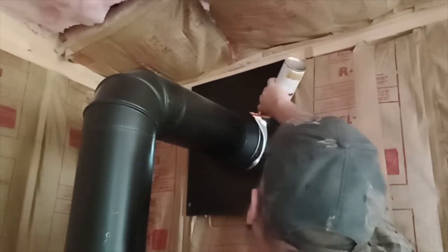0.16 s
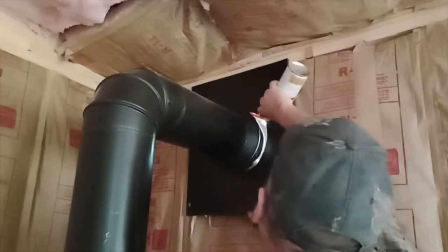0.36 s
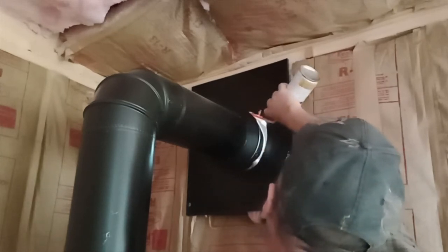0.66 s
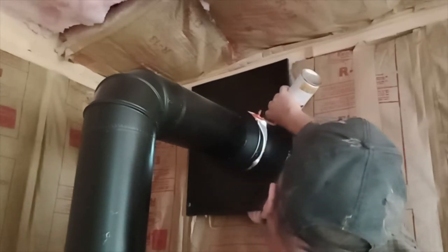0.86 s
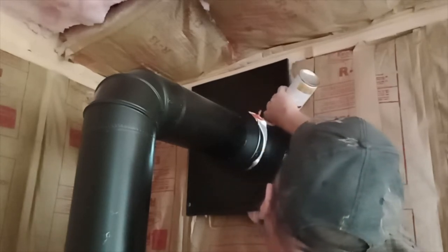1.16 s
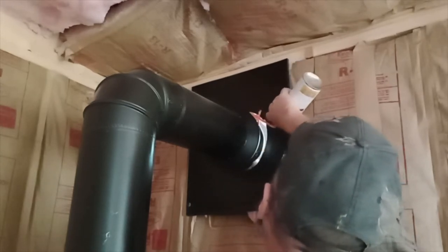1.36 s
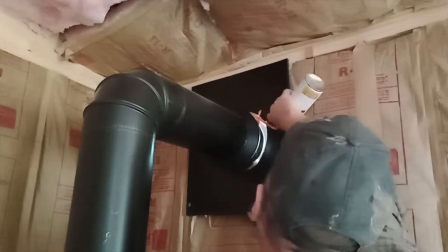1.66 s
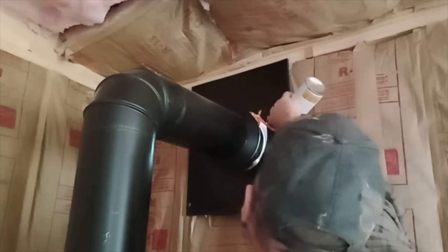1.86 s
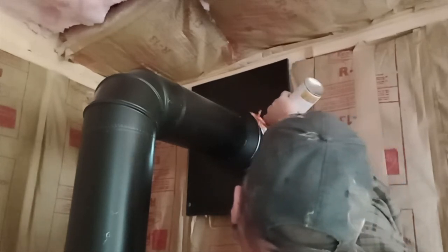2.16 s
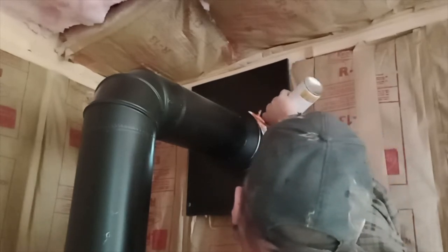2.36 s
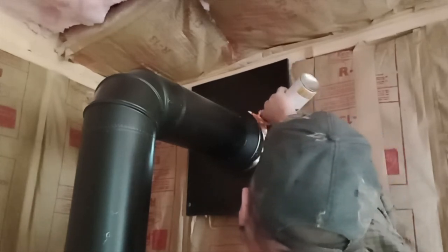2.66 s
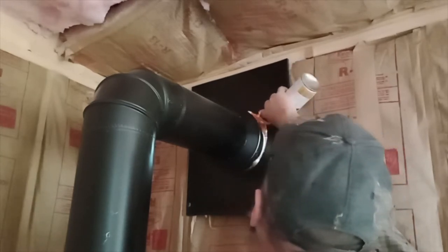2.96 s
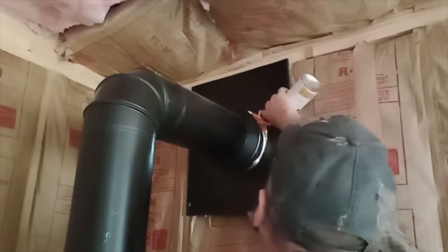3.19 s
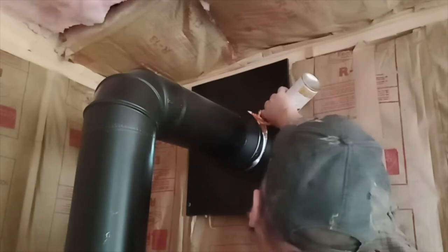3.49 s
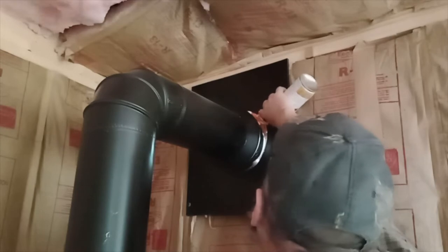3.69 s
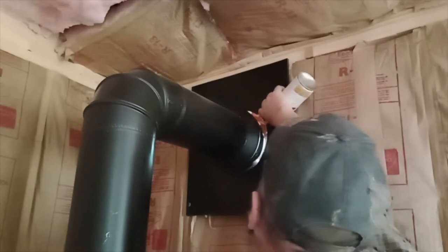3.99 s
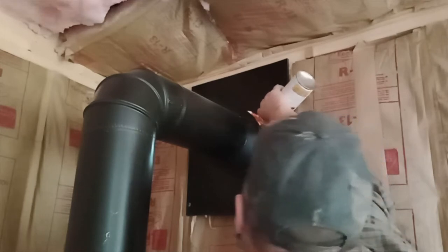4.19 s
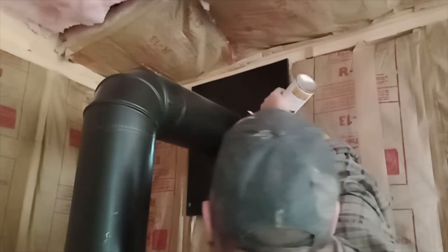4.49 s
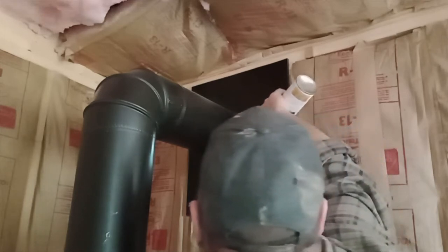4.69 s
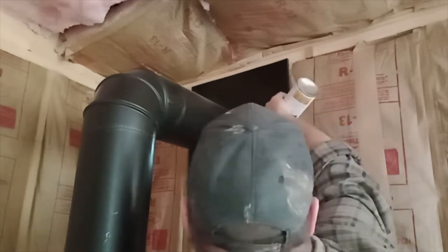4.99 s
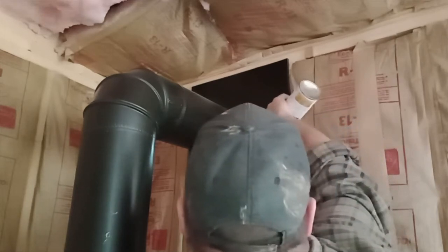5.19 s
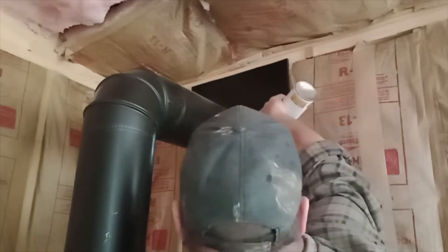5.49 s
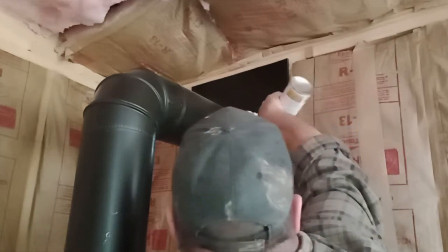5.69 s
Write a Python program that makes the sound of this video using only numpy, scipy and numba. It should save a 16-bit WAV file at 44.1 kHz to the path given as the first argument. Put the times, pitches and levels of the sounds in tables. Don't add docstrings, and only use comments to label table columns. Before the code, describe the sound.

Close, continuous foam spray indoors: a crisp airy hiss with thin whistles, then spurts and pops as the sound dulls and bubbles.

```python
import sys
import numpy as np
from scipy import signal
from scipy.fft import rfft, irfft, next_fast_len
from scipy.io import wavfile
from scipy.ndimage import uniform_filter1d
from numba import njit

SR = 44100
rng = np.random.default_rng(int(sys.argv[2]) if len(sys.argv) > 2 else 0)


def volts_from_db(level):
    exponent = np.asarray(level, float) / 20
    return 10 ** exponent


def wav_out(sig):
    wavfile.write(sys.argv[1], SR, np.round(np.clip(np.atleast_2d(sig).T, -1, 1) * 32767).astype(np.int16))


N = 257984
PADDED = next_fast_len(N)
HZ = np.fft.rfftfreq(PADDED, 1 / SR)


def unit(x):
    return x / np.sqrt(np.mean(x ** 2))


def colour(points):
    hz, db = np.transpose(points)
    return volts_from_db(np.interp(np.log(HZ + 1), np.log(hz), db))


def above(hz, width):
    return np.clip((HZ - hz) / width + .5, 0, 1)


def walk(rate):
    k = int(SR / rate)
    held = np.repeat(rng.standard_normal(N // k + 1), k)
    return 1.13 * uniform_filter1d(uniform_filter1d(held, k), k)[:N]


def swells(at, half):
    t = np.arange(0, N, 64)[:, None] / SR
    return np.exp(-((t - at) / half) ** 2)


def filled(coarse):
    return np.interp(np.arange(N), np.arange(0, N, 64), coarse)


@njit
def moving_mode(x, hz, width):
    y, band, low = np.empty(len(x)), 0., 0.
    for i in range(len(x)):
        g, k = np.tan(np.pi * hz[i] / SR), width / hz[i]
        v = (band + g * (x[i] - low)) / (1 + g * (g + k))
        band, low, y[i] = 2 * v - band, low + 2 * g * v, k * v
    return y


def jet(cells_per_s, spread_db, cells_db, surge_db):
    when, size, side = rng.random((3, N))
    rarity = np.minimum(-np.log(1 - size), 2.2)
    cells = unit(volts_from_db(spread_db * rarity) * np.sign(side - .5) * (when < cells_per_s / SR))
    surge = volts_from_db(surge_db * walk(60) + 1.01 * walk(200))
    return (rng.standard_normal(N) + volts_from_db(cells_db) * cells) * surge


# (time [s], first mode [Hz], second mode over first [ratio], first ring [dB], second ring [dB])
HOLLOW_SHAPES = [(0, 1880, 1.87, -2.5, 8.5), (.4, 2080, 1.75, 3.5, 8), (.7, 2000, 1.65, 5.5, 9.5),
                 (1.05, 1880, 1.75, 6.5, 10), (1.35, 1880, 1.88, 4.5, 4.5), (1.75, 1690, 2.03, -3, -3),
                 (2.1, 1620, 2, -0.5, -6), (2.35, 1360, 1.75, -1, 1), (2.7, 1500, 1.8, 8.5, 2),
                 (3.05, 1460, 2.55, -2, 3), (3.4, 1150, 2.43, 0.5, 1.5), (3.6, 1320, 2.1, 2, 9),
                 (3.93, 1320, 2.6, 7.5, 1), (4.08, 1000, 3.15, 2.5, 8), (4.32, 1340, 2.8, 5, -8),
                 (4.6, 1620, 2.18, 11, 8.5), (5.3, 1360, 2.55, 5, -9), (5.85, 1140, 2, 6.5, -20)]


def hollow(x):
    s, *columns = np.transpose(HOLLOW_SHAPES)
    hz, ratio, low_db, high_db = (np.interp(np.arange(N) / SR, s, c) for c in columns)
    low_hz = hz * (1 + 0.1 * walk(9))
    high_hz = hz * ratio * (1 + 0.032 * walk(7.1))
    low = volts_from_db(low_db + 1.4 * walk(12)) * moving_mode(x, low_hz, 530.0)
    high = volts_from_db(high_db + 1.0 * walk(4.8)) * moving_mode(x, high_hz, 820.0)
    return x + low + high


def nearby_walls(t60, wet_db):
    t = np.arange(int(.3 * SR)) / SR
    tail = rng.standard_normal(len(t)) * 1000. ** (-t / t60) * (t > .001)
    tail = tail * volts_from_db(wet_db) / np.sqrt(np.sum(tail ** 2))
    return 1 + rfft(tail, PADDED)


# (time [s], flow [dB], cover [0-1])
TRIGGER = [(0, -34.5, 0.1), (.2, -34, 0.06), (.57, -35, 0.01), (.87, -33.5, 0.05), (1.0, -34.5, 0.15),
           (1.42, -34.5, 0.01), (1.56, -34, 0.35), (1.8, -33.5, 0.52), (2.3, -33.5, 0.7),
           (2.75, -40.5, 0.69), (2.95, -36, 0.99), (3.35, -37.5, 0.99), (4.0, -40, 0.91),
           (4.4, -40.5, 0.82), (4.52, -45.5, 0.56), (5.0, -39.5, 0.78), (5.4, -43, 0.69),
           (5.85, -41.5, 0.86)]


def control(column):
    table = np.array(TRIGGER)
    return np.interp(np.arange(N) / SR, table[:, 0], table[:, column])


# (time [s], lift [dB], centre [Hz], half length [s])
PUFFS = [(1.607, 6, 3640, 0.014), (1.682, 3, 4400, 0.038), (1.835, -6, 3400, 0.018),
         (1.898, 6.5, 4300, 0.045), (1.958, 3, 6000, 0.015), (2.067, 4, 3420, 0.021),
         (2.223, 11.5, 5300, 0.044), (2.382, 5, 4000, 0.016), (2.445, -2, 5020, 0.025),
         (2.553, 5.5, 7000, 0.056), (2.733, 6, 3200, 0.071), (2.83, 7, 4770, 0.037),
         (2.957, -3.5, 1280, 0.036), (3.055, 7, 4200, 0.018), (3.1, 4, 5000, 0.0073),
         (3.263, 3.5, 2710, 0.046), (3.423, 3.5, 3400, 0.036), (3.624, -1, 3370, 0.031),
         (3.695, -4, 1300, 0.03), (3.777, 3.5, 6500, 0.05), (3.87, 5, 4000, 0.03), (4.007, -4, 2880, 0.036),
         (4.087, -4, 3400, 0.055), (3.355, -5, 2000, 0.017), (3.58, -4, 3300, 0.02), (4.172, -4, 1300, .05),
         (.7, -1, 2500, 0.11), (4.857, 2, 1400, 0.035), (1.446, 4, 3000, .01), (5.47, 2.5, 3000, .03),
         (5.113, -2, 1300, 0.03), (5.248, 5.5, 6000, 0.016), (5.298, 0, 1960, 0.027),
         (5.448, -1, 1300, .02), (5.647, 3, 1980, 0.047), (5.698, -4.5, 1800, 0.018),
         (5.726, 6.5, 1800, 0.031)]
ZONE_MID_HZ = [1300, 3400, 6300, 11000]
CLEAR_DB = [-0.5, 4, 5, 2]
FOAM_LOSS_DB = [0, 16, 21.5, 22.5]


def zone_levels():
    at, lift_db, hz, half = np.transpose(PUFFS)
    puff_shapes = swells(at, half)
    flow_db, cover = control(column=1), control(column=2)
    levels = []
    for mid, clear, loss in zip(ZONE_MID_HZ, CLEAR_DB, FOAM_LOSS_DB):
        octaves_off = np.log2(hz / mid)
        lift = puff_shapes @ (lift_db * np.exp(-(octaves_off / 0.96) ** 2))
        levels.append(flow_db + clear - loss * cover + filled(lift))
    return levels


def bell(hz, width):
    return 1 / (1 + ((HZ[::16] - hz) * 2 / width) ** 2)


# (centre [Hz], width [Hz], depth [dB])
ECHO_DIPS = [(2500, 83, 11.5), (3660, 400, 11), (5060, 200, 1.5), (6300, 160, 3)]


def resonances(modes, bed, bed_db, echo):
    peaks = sum(volts_from_db(db) ** 2 * bell(hz, width) for hz, width, db in modes)
    dips_db = sum(depth_db * bell(hz, width) for hz, width, depth_db in ECHO_DIPS)
    broad = volts_from_db(bed_db) * colour(bed)[::16]
    gain = np.sqrt(peaks + broad ** 2) * volts_from_db(-echo * dips_db)
    return np.interp(HZ, HZ[::16], gain)


# (frequency [Hz], density [dB per Hz])
MIC_PORT = [(4470, -34), (7600, -4), (8080, -6), (9490, 0), (10100, -1), (11400, -5), (13600, -13),
            (14800, -5), (15200, -5), (15700, -8)]


def air(source, gain):
    heard = source * colour(MIC_PORT) * above(ZONE_EDGES_HZ[-1], 160)
    heard = heard * nearby_walls(t60=.05, wet_db=-13.)
    edges = [1] + [above(hz, 500) for hz in range(9300, 14000, 1400)] + [0]
    total = 0
    for lo, hi in zip(edges, edges[1:]):
        total = total + irfft(heard * (lo - hi), PADDED)[:N] * volts_from_db(2.1 * walk(10))
    return gain * unit(total)


ZONE_EDGES_HZ = [650, 2400, 5050, 7800]
# (time [s], length of the move [s])
TIP_MOVES = [
    (0.602, 0.49),
    (1.5, 0.38),
    (2.3, 0.094),
    (3.3, 1),
    (4.03, 0.04),
    (4.45, 0.11),
    (5.15, 0.62),
]
# (centre [Hz], width [Hz], level [dB])
TIP_START = [(960, 24, -4.5), (1296, 110, -1.5), (1707, 17, -4), (2080, 50, 0.5), (2900, 50, -1),
             (3495, 100, 0.5), (3924, 60, 0), (4380, 240, -1.5), (4740, 190, -4), (5400, 19, -8),
             (5700, 130, 1), (6300, 340, -3), (7170, 114, -1.5)]
TIP_OPEN = [(1208, 70, -4), (2010, 250, -8.5), (3200, 110, -11), (3310, 22, -2), (3910, 60, 0),
            (4390, 460, 1.5), (5300, 120, 3), (5880, 110, -2), (6950, 70, -1), (7300, 34, -3)]
TIP_CLOSING = [(1190, 25, -5), (1834, 170, -20), (2706, 18, 6), (3096, 42, 3.5), (3730, 90, 0),
               (4100, 490, -2), (4660, 33, -1), (5375, 300, 1), (6460, 240, 1), (7180, 59, -4)]
TIP_SINKING = [(1223, 58, -2.5), (1540, 170, -4.5), (1880, 37, 2), (2180, 90, -6), (2560, 44, -14),
               (3200, 390, -7.5), (4880, 81, -8), (6370, 260, -7), (7170, 61, -15)]
TIP_BURIED = [(903, 71, 8), (1500, 370, 5), (2320, 63, -17), (2540, 29, -3), (3060, 36, -8),
              (4060, 140, -8), (4540, 220, -5), (6470, 120, -25)]
TIP_SHIFTED = [(940, 91, 1), (1510, 140, -2), (2210, 70, -3), (3280, 410, -24), (4030, 140, -26),
               (4430, 85, -21), (4870, 140, -16), (6600, 50, -20)]
TIP_TURNED = [(900, 240, 3), (1510, 430, -12), (2710, 34, -10), (3050, 130, -8.5), (4500, 260, -13),
              (4100, 260, -13), (5400, 47, -5), (6800, 90, -6)]
TIP_LAST = [(905, 43, -1), (1206, 85, -3), (2310, 230, -6), (2830, 150, -7), (4000, 160, -9),
            (5480, 68, -1), (6250, 320, -4), (6480, 44, -15)]
# (frequency [Hz], density [dB per Hz])
OPEN_BED = [(350, -61), (600, -31), (800, -20), (900, -2.5), (1240, -8.5), (1440, -9), (2020, -7.5),
            (2520, -0.5), (2810, 1), (4980, -17), (5410, -2.5), (6730, 3), (7930, -15), (9600, -7),
            (13500, -10), (15700, -17.5)]
CLOSING_BED = [(350, -60), (600, -19), (770, -14), (900, 0), (1340, -7), (1810, 1.5), (2000, -7.5),
               (3050, 1.5), (3490, -6), (5410, -16.5), (7930, -14), (10300, -12.5), (13500, -24),
               (15700, -24)]
SINKING_BED = [(350, -56), (600, -30), (780, -12), (942, 1), (1540, -16), (1720, -20), (1890, -5),
               (2380, -11.5), (3180, -9), (5260, -7), (6370, -1), (7930, -17), (9220, -17), (15700, -27)]
BURIED_BED = [(350, -44), (640, -5), (800, 2), (1270, -10), (1540, 2), (1700, -6.5), (1860, -7),
              (2380, -26), (3690, -6.5), (4290, -15), (4920, -9.5), (6730, -5.5), (8040, -13.5),
              (10400, -31.5), (13700, -13), (14900, -21), (15700, -23)]
SHIFTED_BED = [(350, -48), (600, -18), (634, -14), (747, 2), (981, -5), (1200, -5), (1520, -1), (1940, 3.5),
               (2770, -18), (3260, -16), (3850, -19), (6920, -18), (15700, -40)]
TURNED_BED = [(350, -43), (600, 10), (778, 5), (1080, -1), (1540, -1), (2260, -3.5), (3050, -9),
              (3740, -16), (4290, -2.5), (4920, -11.5), (6730, -5), (7820, -16), (15700, -29.5)]


def spray():
    t = np.arange(N) / SR
    moved = [1] + [np.clip((t - at) / length + .5, 0, 1) for at, length in TIP_MOVES] + [0]
    # resonances, bed, bed level in dB, share of the pipe echo
    places = [(TIP_START, OPEN_BED, -4., .9), (TIP_OPEN, OPEN_BED, -4., .9),
              (TIP_CLOSING, CLOSING_BED, -4., .4), (TIP_SINKING, SINKING_BED, -4., .2),
              (TIP_BURIED, BURIED_BED, -4., .1), (TIP_SHIFTED, SHIFTED_BED, -4., .1),
              (TIP_TURNED, TURNED_BED, -4., .1), (TIP_LAST, BURIED_BED, -2.5, .1)]
    flickers_db = [0.33, 0.44, 0.56, 0.92]
    gas = jet(cells_per_s=2500, spread_db=6.5, cells_db=-3.0, surge_db=0.6)
    source = rfft(hollow(gas), PADDED) * nearby_walls(t60=.12, wet_db=-12.5)
    shared = 0.5 * walk(14)
    gains = [volts_from_db(db + own_db * walk(17) + shared) for db, own_db in zip(zone_levels(), flickers_db)]
    edges = [above(hz, 160) for hz in ZONE_EDGES_HZ]
    out = air(source, gains[-1])
    for arrived, left, place in zip(moved, moved[1:], places):
        heard = source * resonances(*place)
        share = np.clip(arrived - left, 0, 1)
        for lo, hi, gain in zip(edges, edges[1:], gains):
            zone = irfft(heard * (lo - hi), PADDED)[:N]
            zone = zone / np.sqrt(np.average(zone ** 2, weights=share + 1e-9))
            out = out + share * gain * zone
    return out


# (start [s], end [s], first pitch [Hz], last pitch [Hz], level [dB])
WHISTLES = [(0.497, .62, 6300, 5700, -32), (.6, 0.947, 5800, 5780, -37), (.35, 1.003, 6500, 6500, -46),
            (.6, 1.35, 6850, 6950, -49), (0.305, .9, 4300, 4380, -48), (.95, 1.196, 5950, 6000, -49),
            (1.553, 1.7, 3840, 3800, -43), (4.3, 4.606, 2000, 2100, -54), (4.396, 4.5, 2700, 2730, -53),
            (4.494, 4.62, 4200, 4200, -53), (5.78, 5.85, 1200, 1150, -46), (0.557, 1.003, 5450, 5220, -38),
            (0.942, 1.54, 5370, 5280, -42), (0.393, 0.94, 2055, 2040, -43.5),
            (1.212, 1.525, 4350, 4360, -40), (1.406, 1.889, 1860, 1750, -41),
            (1.905, 2.256, 1840, 1780, -48), (2.305, 2.603, 1110, 1320, -47), (2.4, 2.74, 1500, 1550, -44),
            (3.0, 3.3, 1840, 1880, -53), (3.1, 3.36, 1090, 1060, -55), (4.05, 4.152, 3400, 3450, -51),
            (2.407, 2.95, 1930, 1820, -57), (3.205, 3.377, 1330, 1220, -45), (3.51, 3.677, 1430, 1350, -52),
            (3.72, 3.95, 1500, 1570, -46), (4.105, 4.286, 920, 1000, -47.5),
            (4.117, 4.2, 1540, 1610, -42.5), (4.21, 4.46, 1600, 1450, -46.5),
            (4.62, 4.803, 1880, 1850, -53), (4.798, 5.08, 1540, 1500, -53), (4.82, 4.92, 1300, 1100, -48),
            (5.2, 5.362, 2230, 2270, -50), (5.445, 5.67, 1244, 1460, -46.5), (5.3, 5.423, 1200, 1150, -54),
            (2.6, 2.93, 2180, 2200, -47.5)]


def whistles():
    out = np.zeros(N)
    gas = jet(cells_per_s=1500, spread_db=6.5, cells_db=-3.5, surge_db=1.8) * volts_from_db(1.5 * walk(11))
    wander = 1 + 0.009 * walk(8)
    for start, end, from_hz, to_hz, db in WHISTLES:
        span = slice(int(start * SR), int(end * SR))
        hz = np.linspace(from_hz, to_hz, span.stop - span.start) * wander[span]
        t = np.arange(len(hz)) / SR
        fade = np.clip(np.minimum(t, t[-1] - t) / 0.038, 0, 1)
        width_hz = 0.046 * min(from_hz, 3500.)
        out[span] += volts_from_db(db) * fade * unit(moving_mode(gas[span], hz, width_hz))
    return out


# (time [s], level [dB], centre [Hz], width [Hz], fade [s])
SPURTS = [(1.86, -40, 3080, 1200, .05), (1.81, -44, 9500, 4000, .06), (1.862, -41, 10300, 4000, 0.029),
          (2.175, -34.5, 3200, 1500, 0.1), (2.205, -34, 4550, 2200, 0.06), (2.19, -41.5, 10200, 4000, 0.08),
          (2.205, -46, 15000, 1500, .05), (2.37, -55, 9500, 2500, 0.033), (2.82, -39.5, 2650, 700, 0.077),
          (3.038, -39, 3240, 900, 0.02), (3.065, -43, 3300, 700, .012), (3.245, -49, 3380, 700, .04),
          (3.43, -46, 3200, 890, .04), (4.038, -46.5, 3200, 900, 0.07), (1.59, -38, 4100, 900, .03),
          (2.66, -48, 3120, 900, .15), (4.33, -50, 3100, 900, 0.1), (4.28, -46, 1710, 600, 0.072),
          (5.22, -50.5, 2230, 500, 0.17), (5.61, -49, 1300, 900, .008), (5.719, -40.5, 2010, 1100, 0.036)]


def spurts():
    t, out = np.arange(N) / SR, 0
    gas = jet(cells_per_s=930, spread_db=-3.0, cells_db=-8.0, surge_db=-2.0)
    for at, db, hz, width, fade in SPURTS:
        centre = np.full(N, 1. * hz)
        once = moving_mode(gas, centre, 1. * width)
        ring = unit(moving_mode(once, centre, 1. * width))
        since = np.maximum(t - at, 0)
        out = out + volts_from_db(db) * ring * np.minimum(since / 0.0029, 1) * np.exp(-since / fade)
    return out


# (time [s], peak [dB], ring [Hz])
POPS = [(2.085, -17.5, 3000), (2.219, -11, 5400), (2.244, -15, 3200), (2.285, -19, 2240), (2.37, -22, 2900),
        (4.65, -32, 3130), (4.788, -37, 3080), (4.825, -26, 6640), (4.972, -28, 1500), (5.044, -30, 3990),
        (5.046, -30, 1500), (5.146, -30, 2980), (5.255, -27, 1500), (5.664, -25, 1600), (5.74, -28, 2400),
        (2.469, -27, 1900), (2.501, -29, 1590), (2.601, -23, 1570), (2.818, -22, 1870), (2.913, -24, 1890),
        (3.024, -26, 1440), (3.067, -28, 1390), (3.283, -26, 1290), (3.59, -33, 1460), (3.666, -25, 1440),
        (3.839, -27, 1460), (4.109, -29, 960), (4.275, -21, 1510), (4.332, -28, 1440), (4.364, -28, 1580),
        (4.637, -26, 1850), (4.656, -24, 1840), (4.688, -25, 1470), (4.774, -22.5, 1500),
        (5.304, -26, 1590), (5.61, -22.5, 1200), (5.723, -27, 1800)]


def pops():
    out, t = np.zeros(N + SR), np.arange(SR // 50) / SR
    for at, db, hz in POPS:
        cycles = t * hz
        shape = np.minimum(cycles, 1) ** 2 * np.exp(-cycles / 3.2)
        ring = np.sin(2 * np.pi * cycles) * shape
        ring = ring - shape * ring.sum() / shape.sum()
        out[int(at * SR):][:len(t)] += volts_from_db(db - 1.5) * ring
    return out[:N]


# (frequency [Hz], density [dB per Hz])
ROOM_HUM = [(12, -61), (20, -39), (43, -40.5), (151, -20.5), (184, -26.5), (224, -3), (264, 1.5), (284, 0),
            (325, -13), (420, -3.5), (466, -9.5), (510, -5), (566, -15.5), (639, -18), (720, -12.5),
            (940, -43), (1580, -120)]
# (time [s], rumble lift [dB], drone lift [dB], half
# length [s])
THUDS = [(.01, -14, 4.5, .03), (0.124, -6, -1, .03), (0.61, -15, 3, 0.034), (0.977, -2, -2, 0.046),
         (1.27, -6, -1, .05), (1.6, -1.5, -0.5, 0.26), (0.79, -4, -3, 0.16), (1.364, 1, 0.5, 0.046),
         (1.96, 8, -0.5, 0.036), (2.205, 4, -1.5, 0.14), (2.525, 4, -0.5, 0.08), (2.07, -7, 1, .03),
         (2.3, -6, -4, 0.033), (2.798, 5, 1.5, 0.13), (2.95, -10, 0, .02), (3.06, 4, -1, 0.029),
         (3.27, 1, 3, .07), (3.53, -6, -0.5, 0.026), (3.874, 3, 4, 0.067), (3.764, 3, 1.5, 0.19),
         (4.378, 6, 0.5, 0.18), (4.817, 3, 0, .04), (4.89, -10, -1, .03), (5.07, -6, 2.5, .02),
         (5.127, 6, 3, .02), (5.18, -7, 0, .02), (5.77, 1, 0, .03), (.45, -5, 0.5, .04), (3.85, -5, 2, .03),
         (4.99, 8, -4, 0.046), (5.347, 9, 1.5, 0.06)]


def hum():
    at, rumble_lift_db, drone_lift_db, half = np.transpose(THUDS)
    thud_shapes = swells(at, half)
    recovery_db = 0.5 * control(column=2)
    noise = rfft(rng.standard_normal(PADDED)) * colour(ROOM_HUM) * (HZ < 760)
    deep = 1 / (1 + (HZ / 185) ** 20)
    rumble_db = -70 + recovery_db + filled(thud_shapes @ rumble_lift_db)
    rumble_db = rumble_db + 1.2 * walk(7.5) + 3.0 * walk(22)
    drone_db = -52 + recovery_db + filled(thud_shapes @ drone_lift_db) + 1.34 * walk(5)
    rumble = unit(irfft(noise * deep, PADDED)[:N]) * volts_from_db(rumble_db)
    drone = unit(irfft(noise * (1 - deep), PADDED)[:N]) * volts_from_db(drone_db)
    return rumble + drone


def mic_hiss():
    noise = rfft(rng.standard_normal(PADDED)) * colour(MIC_PORT) * (HZ > 7700)
    noise = noise * volts_from_db(-6.0 * ((HZ > 8800) & (HZ < 11800)))
    return unit(irfft(noise, PADDED)[:N]) * volts_from_db(-61.0)


def scene():
    return (spray() + whistles() + spurts() + pops() + hum() + mic_hiss())[None]


# (time [s], share of tones kept [0-1], spared below [Hz])
THIN_MOMENTS = [
    (.0685, .045, 300),
    (.4312, .045, 300),
    (1.2632, .036, 300),
    (1.3058, .03, 250),
    (1.4978, .04, 500),
    (1.7752, .035, 600),
    (5.5085, .012, 1700),
]


def thin_out(x, lost, boost_db, masking):
    size = 1880
    window = np.sin(np.pi * (np.arange(size) + .5) / size)
    notch = (1 - (1 - lost * window ** 2) ** .7) / window
    hz = np.fft.rfftfreq(size, 1 / SR)
    out = x.copy()
    for at, kept, spared_hz in THIN_MOMENTS:
        middle = int(at * SR)
        span = slice(middle - size // 2, middle + size // 2)
        tones = rfft(x[span] * window)
        strength = np.abs(tones)
        heard = strength / (uniform_filter1d(strength, size=70) + 1e-9) ** masking
        weak = heard < np.quantile(heard, 1 - kept)
        hit = (hz > spared_hz) | (hz < 190)
        out[span] += window * (volts_from_db(boost_db) - 1) * irfft(tones * hit * ~weak, size)
        out[span] -= notch * irfft(tones * hit * weak, size)
    return out


def top_cut(x):
    return signal.sosfilt(signal.butter(12, 17090, fs=SR, output="sos"), x)


def record(dry):
    rounded = .4 * np.tanh(dry[0] / .4)
    cut = irfft(rfft(rounded, PADDED) * (HZ < 15700), PADDED)[:N]
    thin = thin_out(cut, lost=.99, boost_db=4, masking=.6)
    return top_cut(thin[None])


dry = scene()
out = record(dry)
wav_out(out)
```